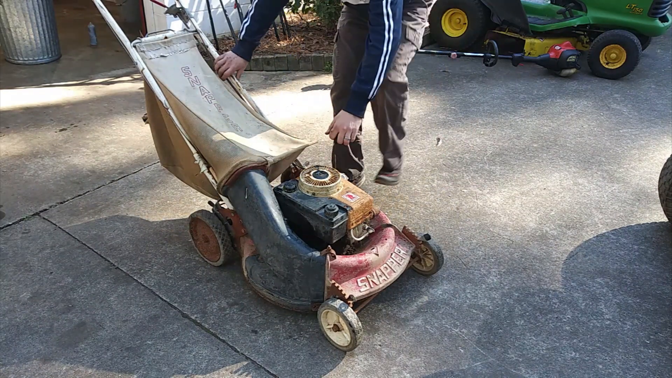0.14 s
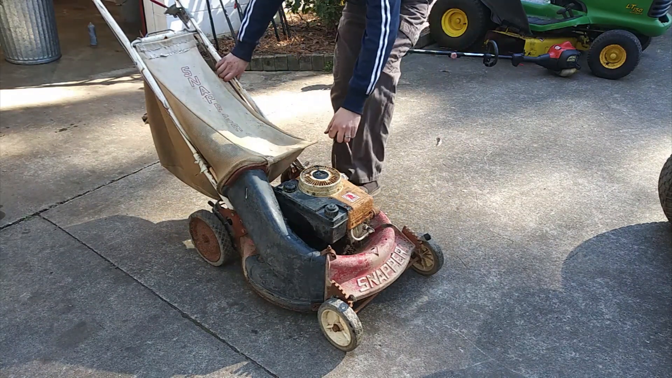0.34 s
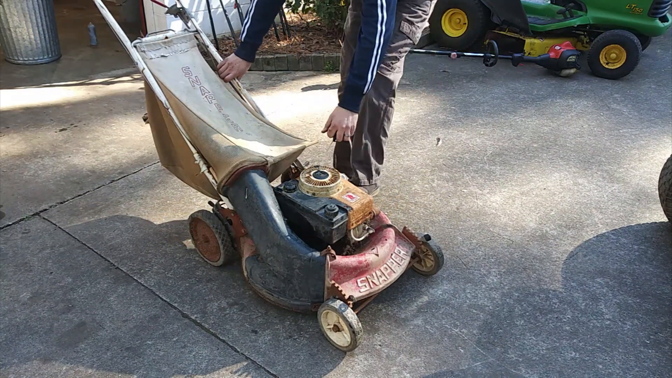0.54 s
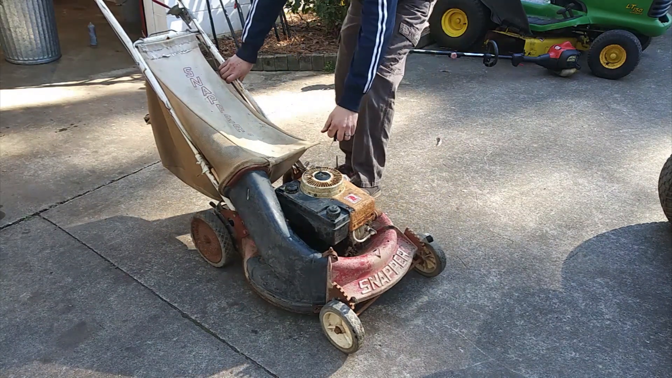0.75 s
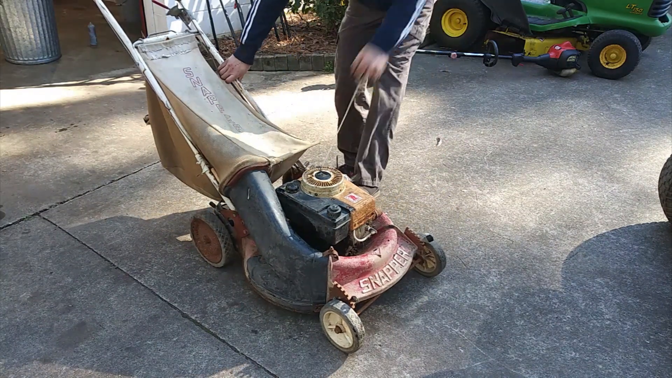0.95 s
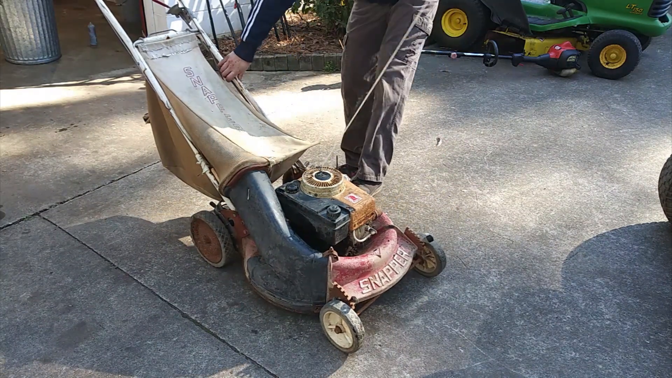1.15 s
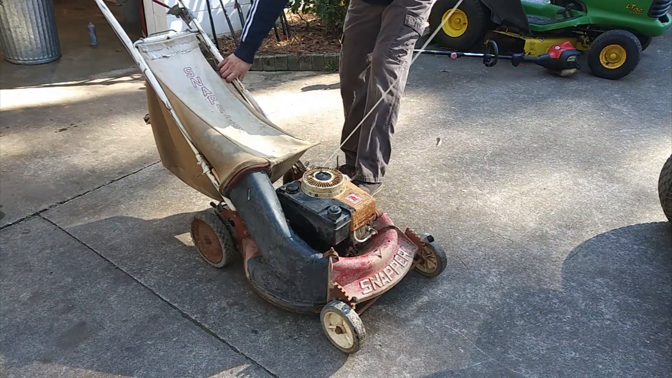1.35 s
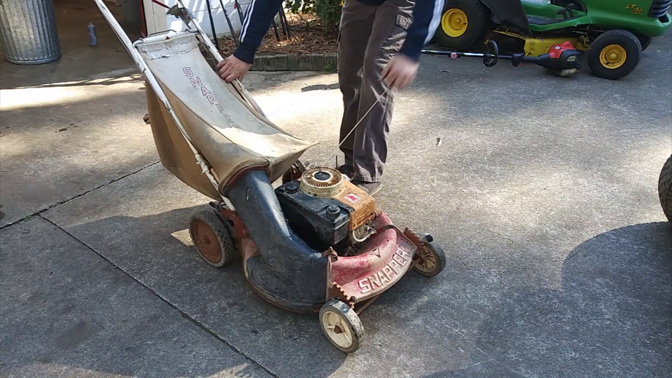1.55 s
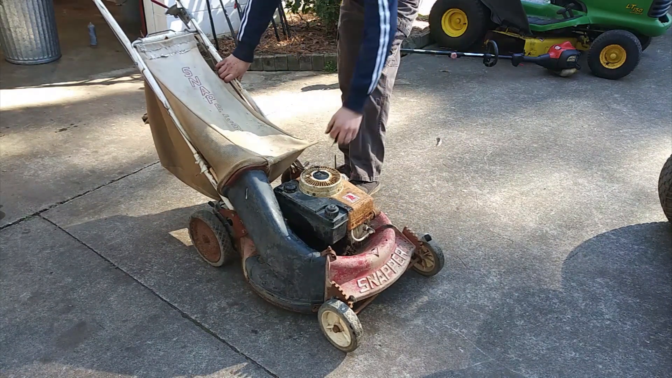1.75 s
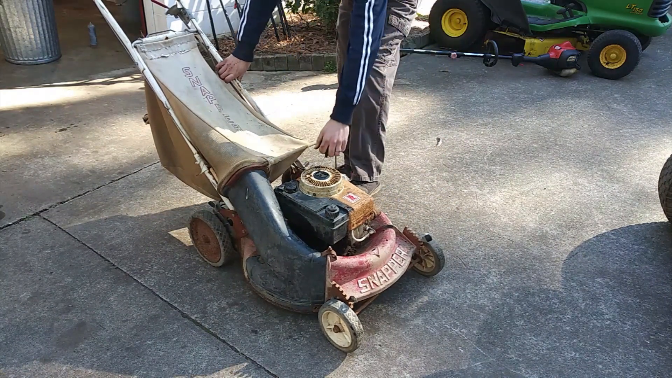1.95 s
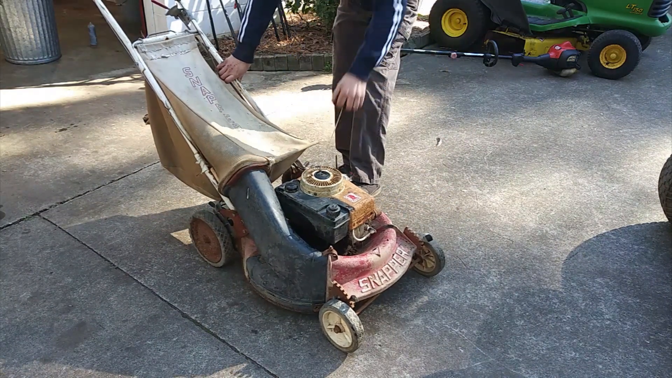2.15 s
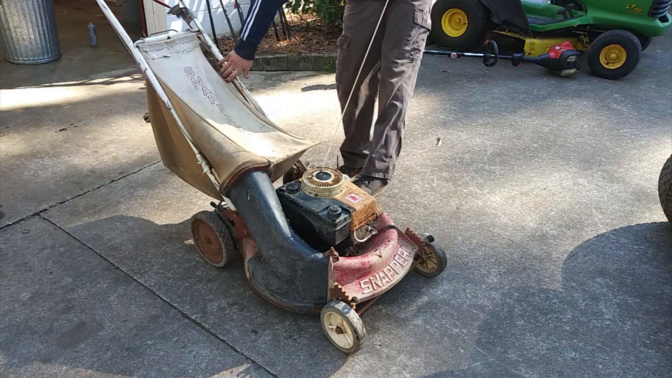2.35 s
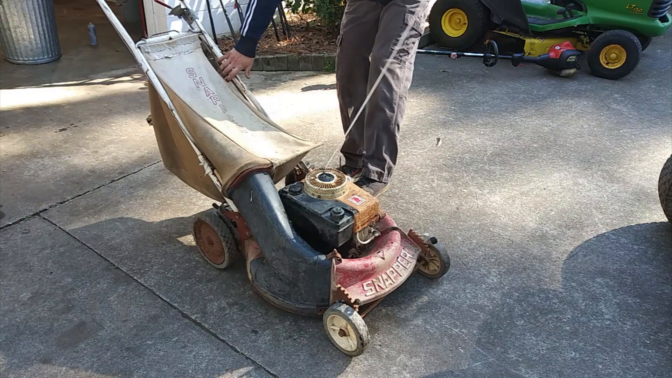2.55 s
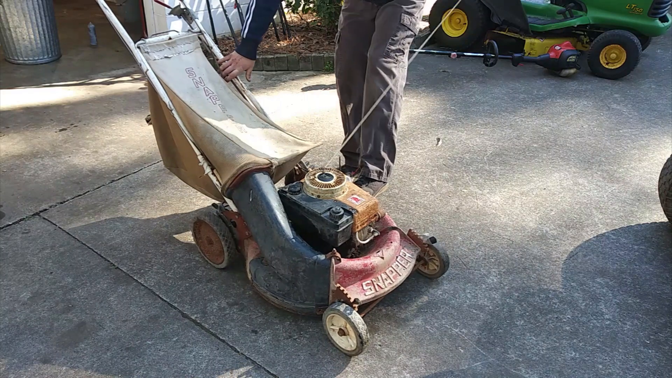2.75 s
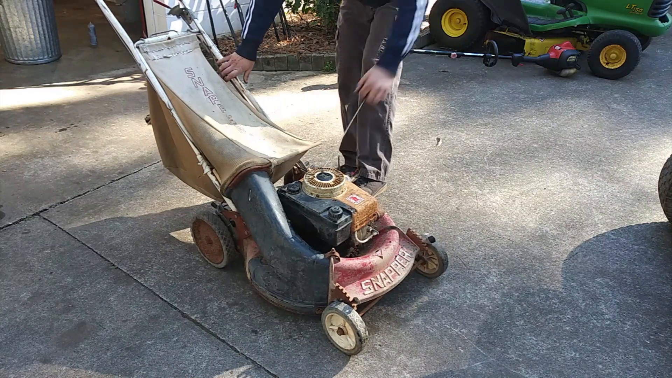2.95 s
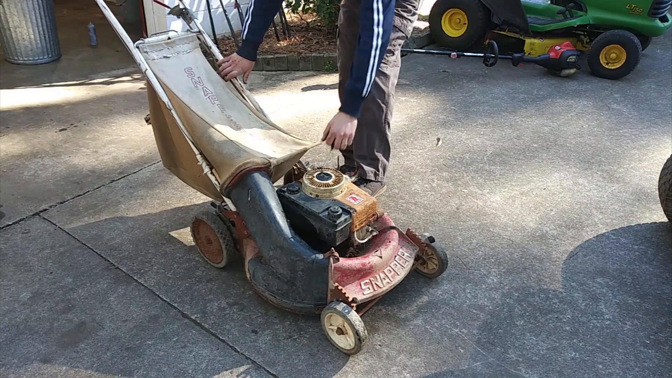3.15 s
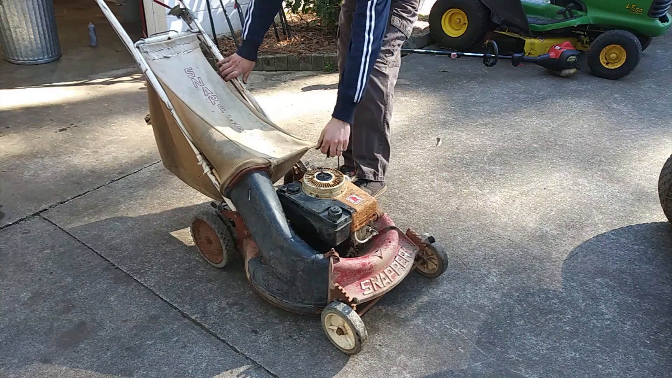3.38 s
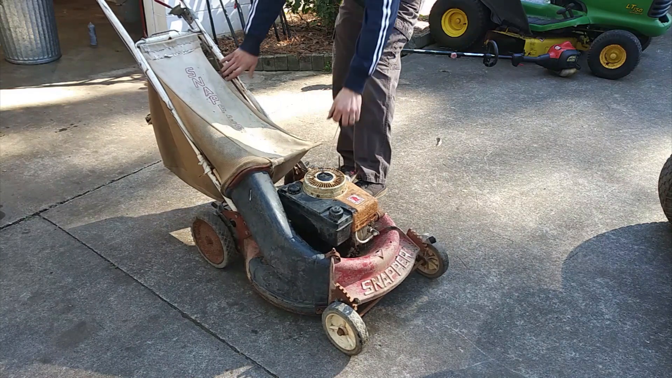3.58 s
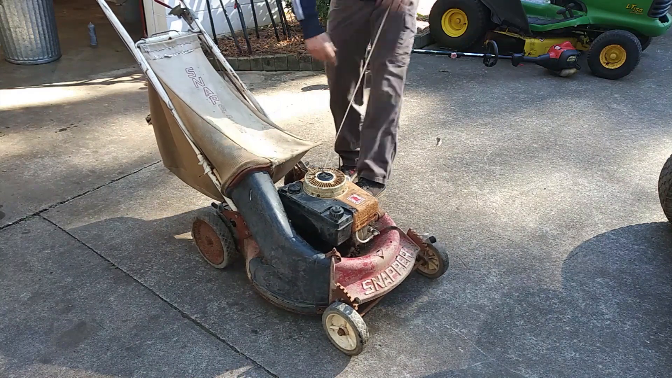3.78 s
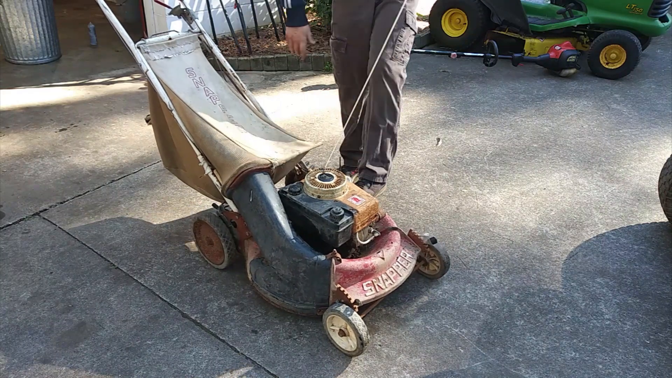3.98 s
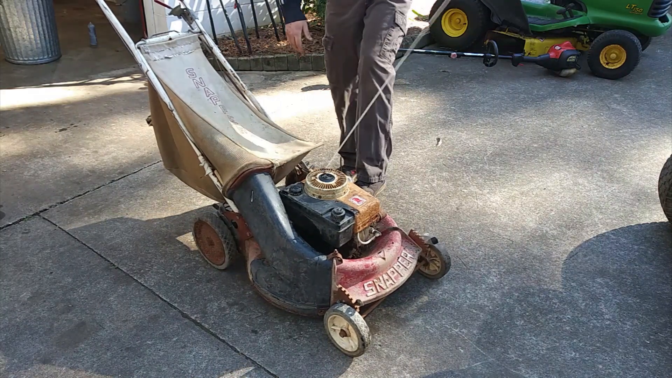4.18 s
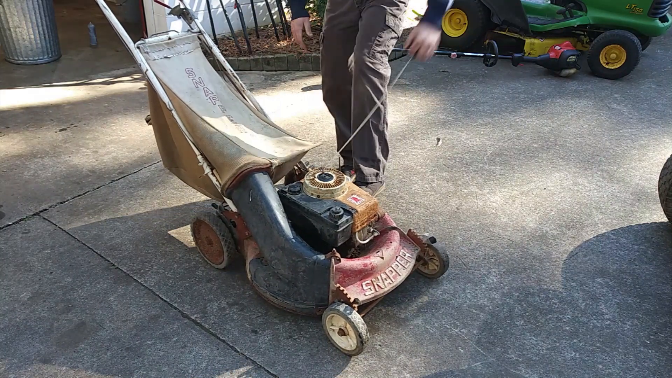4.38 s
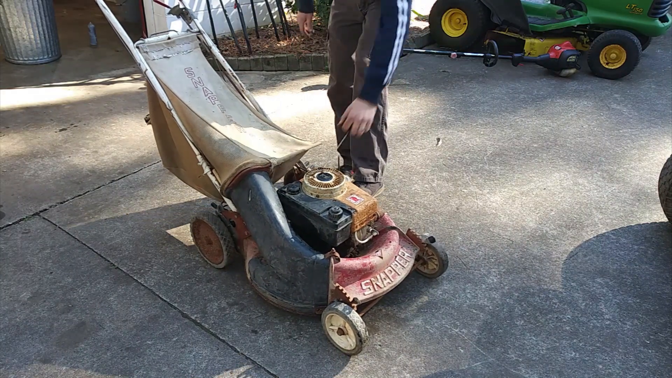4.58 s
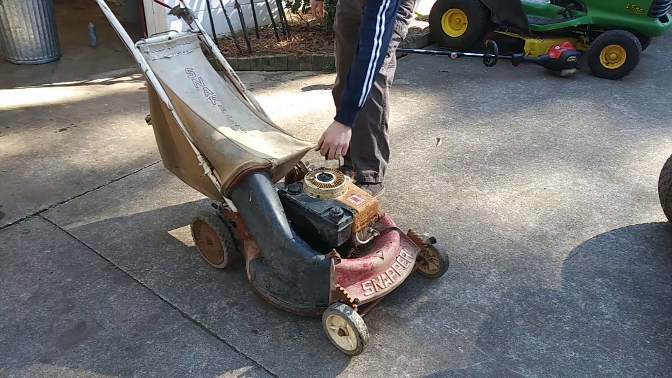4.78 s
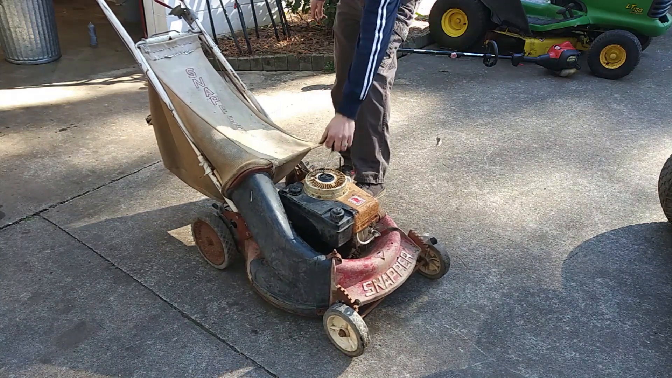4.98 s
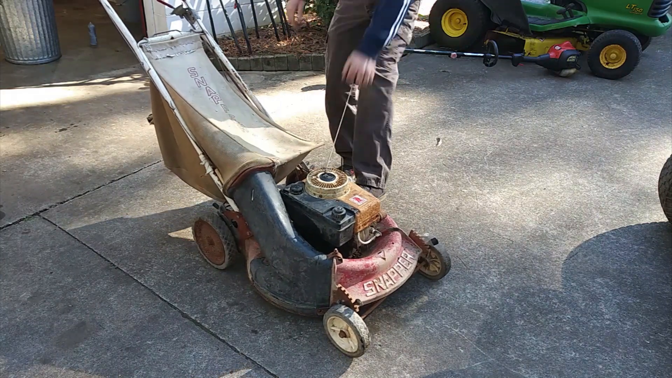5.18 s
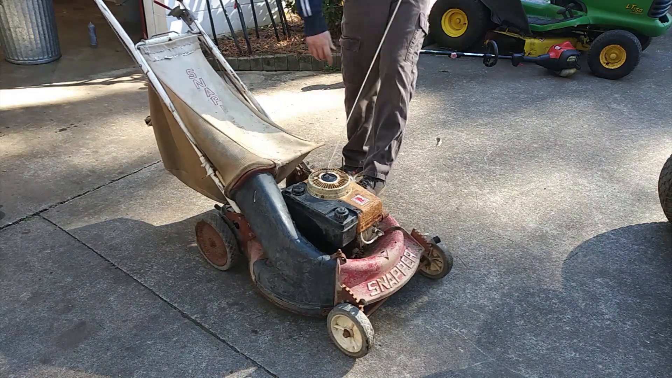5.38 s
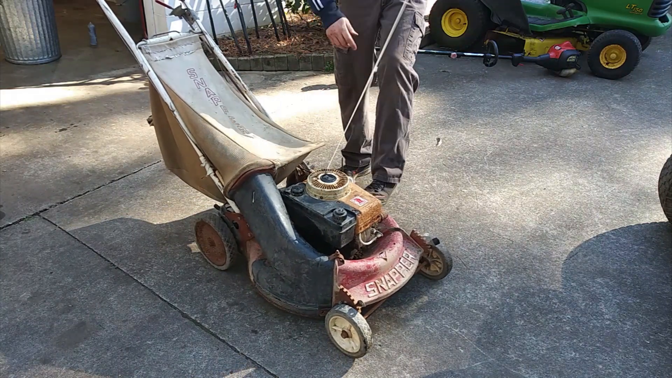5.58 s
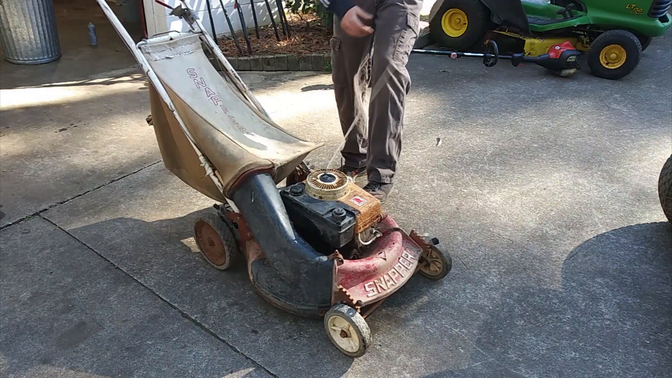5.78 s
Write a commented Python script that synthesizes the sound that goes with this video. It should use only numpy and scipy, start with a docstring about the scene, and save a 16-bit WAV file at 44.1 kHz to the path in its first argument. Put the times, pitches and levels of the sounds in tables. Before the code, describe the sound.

Faint, soft outdoor air on a driveway, heard from fairly near an old walk-behind mower. Small handling clicks and a light rope slide begin around 0.5 s. At 0.8 s the first pull starts: pawls click, a short groan, a rough, quickly fading whir, then a few slow hollow knocks in the steel deck until about 1.3 s, with rope scuffing and rewinding to 1.8 s. The second pull at 2.1 s is firmer, with a clearer rising whir, brief squeaks and heavy clunks near 2.4 s, rewinding until just after 3 s. The third, at 3.6 s, spins faster, with a dense run of knocks from 3.7 to 4.2 s and clattering loose parts, then rope hiss and clacks to 4.7 s. The last, at 5.05 s, is strongest: zip, squeak, rapid knocking from 5.2 s, slowing to 5.7 s as the rope slides back. The engine never fires; echoes are short and faint.

```python
"""Faint outdoor air, then light clacks and a rope slide: an old mower on a driveway, starter rope
pulled four times; the engine never fires. In each pull the pawls catch, the rope whirs out, the
engine turns over and knocks in the steel deck, then coasts to a stop as the spring rewinds the rope.
Impacts and friction are shaped noise driven through deck resonances; the whir and squeaks are
unsteady tones; sparse decaying echoes answer from house and fence."""
import sys
import numpy as np
from scipy import signal
from scipy.fft import rfft, irfft
from scipy.io import wavfile
from scipy.ndimage import uniform_filter1d, map_coordinates

SR = 44100
rng = np.random.default_rng(int(sys.argv[2]) if len(sys.argv) > 2 else 0)


def master(y):
    """Save y as 16-bit WAV."""
    cut = np.clip(np.atleast_2d(y).T, -1, 1)
    pcm = np.round(cut * 32767)  # scale
    wavfile.write(sys.argv[1], SR, pcm.astype(np.int16))


N = 256926  # samples

# Table levels are relative, ahead of the trims in the functions.
# outdoor background spectrum: [f/Hz, density/dB per Hz]
AIR_SPECTRUM = [(25, -35), (70, -31), (100, -21), (130, -11), (210, 0.5), (400, -2.5), (800, -1.5),
                (1500, -4), (2500, -11.5), (4000, -14), (7700, -27), (16000, -20.5)]
# clacks of pawls, rope and grip: [t/s, strength/dB, then re strength: thud/dB, tick/dB, snap/dB]
CLACK_EVENTS = [(0.023, -34.5, -6.5, -15.5, -37), (0.338, -44, 0, -20, -30), (0.449, -45, -7, -20, -40),
                (0.466, -49.5, -1.5, -24, -40), (0.57, -27, -16, -16.5, -31), (0.649, -22, -8, -14, -23.5),
                (0.715, -23, -15.5, -15.5, -27), (0.904, -20.5, -22, -11.5, -31),
                (1.069, -13, -18, -17, -24), (1.161, -19.5, -28, -18, -30), (1.208, -30, -11, -1, -30),
                (1.256, -25.5, -11, -9.5, -21), (1.609, -24.5, -20, -16, -28),
                (1.649, -25.5, -45, -18.5, -26), (1.731, -34, -12, -10, -9.5), (1.762, -34, -19, -3.5, -12),
                (2.073, -40.5, 0, -3.5, -11), (2.095, -19, -8, -11, -14.5), (2.118, -25.5, -2, -18, -22),
                (2.198, -24, -3, -15, -41), (2.477, -26, -5, -6.5, -16), (2.616, -24.5, -36, -10.5, -18.5),
                (2.715, -23.5, -12.5, -17, -28), (2.764, -25, -21.5, -9.5, -30), (2.919, -31, 5, -21, -36),
                (2.933, -32.5, 3, -11, -36), (3.204, -40, -8, 0, -7), (3.452, -47.5, -20, -5, -19),
                (3.503, -29.5, -1, -15, -18.5), (4.05, -28.5, -2, -2.5, -47), (4.082, -22.5, -5.5, -3, -20),
                (4.206, -29.5, -26, -11, -18), (4.246, -25, -5, -9.5, -47), (4.331, -21.5, -40, -18, -40),
                (4.401, -25, -11.5, -14, -35), (4.505, -40, -3.5, -2, -8), (4.524, -29.5, -31, -3, -17),
                (5.036, -44, 4, -7, -12), (5.07, -19, -6.5, -12.5, -15.5), (5.144, -24.5, -3, -11, -19),
                (5.616, -27.5, -7, -8, -17), (5.751, -23, -34, -20, -41), (5.796, -28.5, -32, -10, -33)]
# force spectrum of a clack: [f/Hz, density/dB per Hz]
CLACK_SPECTRUM = [(30, -29), (100, -37), (180, -7.5), (350, 5), (800, 6.5), (1600, 8), (3000, 18),
                  (4600, 12), (6500, -1.5), (8000, -18), (13000, -21.5), (16000, -23)]
# resonances of deck and engine shroud: [f/Hz, width/Hz, level/dB]
DECK_MODES = [(223.4, 19, 11), (264, 18, -16), (351, 9.9, 17.5), (391, 70, 12.5), (405, 18, 7),
              (505, 35, 11), (586.7, 4.6, 11), (607, 4, 19), (655, 47, 7), (741.4, 52, 14), (940, 63, 16),
              (1018, 134, 15), (1057, 29, 19.5), (1276, 8.9, 18.5), (1250, 18, 10), (1328, 50, 17.5),
              (1720, 86, 3.5), (1784, 15.4, 15.5), (1934, 75, 11), (2290, 150, 7.5), (4230, 150, 2)]
# resonances of starter cup and cover: [f/Hz, width/Hz, level/dB]
STARTER_MODES = [(1510, 390, 17), (2040, 150, 6.5), (3300, 27, 11), (4035, 14, -18), (4290, 58, -29.5),
                 (5940, 74, 1), (6570, 84, -28), (8750, 77, 12.5)]
# slow ringing of blade and deck: [f/Hz, t60/s, level/dB]
BLADE_MODES = [(217, .5, -39), (1044, 0.35, -38), (1381, 1.0, -34), (2330, 0.31, -45), (4480, 0.57, -41)]
# echo decay from house and fence: [f/Hz, t60/s]
YARD_T60 = [(200, 0.34), (1000, 0.17), (4000, 0.039), (12000, 0.24)]
# slack rope over the reel, wound in by spring or taken up by hand:
# [start t/s, length t/s, hiss/dB, reel rumble/dB]
ROPE_SLIDES = [(0.562, 0.2, -64, -45.5), (0.781, 0.071, -51.5, -40), (1.199, 0.52, -53, -46.5),
               (1.98, 0.14, -62.5, -58), (2.496, 0.588, -53.5, -51), (3.102, 0.21, -66, -52),
               (3.39, 0.13, -66, -73), (3.489, 0.39, -57, -38.5), (4.044, 0.587, -55, -43),
               (4.527, 0.22, -62, -60), (4.95, 0.3, -58.5, -54.5), (5.507, 0.42, -52, -46)]
# returning rope scuffs the shroud and shakes the reel: [middle t/s, build-up t/s, hiss/dB, reel rumble/dB]
ROPE_SCUFFS = [(1.361, 0.037, -46, -31.5), (1.499, 0.015, -47, -32), (1.764, 0.049, -51.5, -38.5),
               (2.582, 0.022, -42.5, -34), (2.891, 0.037, -51.5, -36.5), (2.965, 0.028, -60, -37),
               (3.213, 0.036, -43, -34.5), (4.16, 0.023, -45, -44), (4.43, 0.027, -49, -55),
               (4.544, 0.034, -42.5, -36), (5.666, 0.016, -41, -31)]
# pulls: [start t/s, then from start: half speed t/s, first swish t/s; stroke length t/s, coasting t/s,
# strength/dB, strain/dB, top whir f/Hz, whir/dB, whir roughness 0-1, whir fade after first swish/dB per s]
ROPE_PULLS = [(0.799, .075, 0.177, 0.32, 0.38, -3.5, -0.5, 1793, -32, 0.83, 90),
              (2.095, 0.12, 0.179, 0.32, 0.53, -0.5, 1.5, 2340, -27.5, 0.37, 1),
              (3.59, 0.13, 0.174, 0.382, 0.43, 0, 1, 2570, -30, 0.47, 25),
              (5.06, 0.15, 0.2, .40, 0.58, 1, -1.5, 2595, -28, 0.45, 21)]
# force spectra of rope hiss, rumble and loose-part rattle: [f/Hz, density/dB per Hz]
ROPE_SPECTRUM = [(100, -37), (400, -29), (2000, 7.5), (4500, 12.5), (6800, 8), (8000, -0.5), (9500, 1),
                 (13000, -1), (16000, -7.5)]
RUMBLE_SPECTRUM = [(30, -71), (100, -54), (125, -31), (170, -7.5), (220, -3), (320, 0.5), (650, 0.5),
                   (900, -12.5), (1400, -17.5), (4000, -40)]
RATTLE_SPECTRUM = [(100, -87), (500, 2.5), (950, 8), (1800, 5.5), (2600, 7.5), (3300, 6), (4600, 15.5),
                   (6500, -77), (8000, -15.5), (16000, -37)]
# groans and high squeaks of the loaded reel: [start t/s, end t/s, start f/Hz, end f/Hz, level/dB]
REEL_SQUEAKS = [(0.809, 0.878, 331, 468, -37), (2.102, 2.167, 323.4, 348, -28),
                (0.879, 0.91, 789, 674, -31), (1.117, 1.14, 740, 700, -32), (1.716, 1.761, 636, 623, -38.5),
                (2.155, 2.175, 500, 540, -24), (2.217, 2.294, 729, 585, -24.5),
                (3.65, 3.698, 737, 597, -26), (3.729, 3.782, 684, 650, -25.5), (5.229, 5.28, 622, 610, -23),
                (2.24, 2.298, 7400, 7300, -37.5), (2.362, 2.382, 7000, 6800, -32.5),
                (5.226, 5.29, 7160, 7000, -34.5)]
# knocks of crank and blade: [t/s, strength/dB, thud re strength/dB, tick re strength/dB, shake-out t/s]
KNOCK_EVENTS = [(0.897, -21.5, -6.5, -11, 0.011), (1.052, -10, -12, -41, 0.015),
                (1.134, -14, -10.5, -14.5, 0.043), (1.197, -19, -10, -31, 0.035),
                (1.298, -16.5, -8.5, -25, 0.02), (2.159, -15.5, -9, -25, 0.068), (2.222, -28, 0, -14, 0.03),
                (2.349, -15, -10, -40, 0.06), (2.416, -3.5, -14.5, -23.5, 0.035),
                (2.467, -14, -13, -25, .04), (2.543, -12.5, -10, -45, 0.026), (2.587, -19, -15, -19, 0.011),
                (2.65, -10.5, -13, -19.5, 0.015), (3.712, -15, -9.5, -23, 0.03),
                (3.77, -13, -16, -22, 0.033), (3.814, -5.5, -18, -21.5, 0.035),
                (3.857, -8.5, -20, -32, 0.018), (3.921, -7.5, -14, -43, 0.034),
                (3.988, -3.5, -14.5, -22, 0.019), (4.037, -14.5, -12.5, -29, 0.02),
                (4.121, -8.5, -14.5, -43, 0.027), (4.246, -18, -13.5, -16, 0.021),
                (5.203, -19, -5.5, -28, 0.02), (5.264, -22, -5, -35, 0.014),
                (5.306, -4, -16, -23.5, 0.0099), (5.349, -7, -15.5, -23.5, 0.036),
                (5.387, -18, -13, -20, .016), (5.409, -4.5, -15.5, -31, 0.046),
                (5.471, -4.5, -16, -20.5, 0.012), (5.516, -9.5, -13, -41, 0.028),
                (5.591, -12, -10, -27, .017), (5.692, -9, -13, -19.5, 0.016)]
# force spectrum of a knock: [f/Hz, density/dB per Hz]
KNOCK_SPECTRUM = [(30, -54), (100, -45), (125, -13.5), (170, -17), (330, 4), (900, 6), (1800, 9.5),
                  (3000, 0.5), (4600, -14), (6500, -30), (8000, -37), (16000, -37)]

# pull: load comes on, rope speeds up, drive fades after the stroke
GRAB_S, SPIN_UP_S, LET_GO_S = 0.05, 0.045, 0.085
# relative levels at full speed, and the power of speed each follows
RUMBLE_DB, RUMBLE_POWER = -31.5, 0.74
RATTLE_DB, RATTLE_POWER = -25, 1.075
HISS_DB, HISS_POWER = -42, 0.67
DRAG_DB = -28  # reel rumble while the rope drives it
SWISH_DB, SWISH_S = -34.5, 0.017  # near full speed and again as the arm stops
SLIDE_EDGE_S, REEL_RATTLE_DB = 0.039, -8  # rattle re the reel's rumble
REEL_RUN_ON_S, REEL_RUN_ON_DB = 0.11, -9
SCUFF_STOP = 0.61  # decay time / build-up time
# compression loads the crank and quiets loose parts just ahead of each knock
SQUEEZE_DB, SQUEEZE_LEAD_S, SQUEEZE_S = -2.5, 0.0065, 0.02


def amp(db):
    """Decibels to gain."""
    return 10 ** (np.asarray(db) / 20)


def evened(x):
    """Scales to rms 1."""
    return x / np.sqrt(np.mean(x ** 2) + 1e-20)


def read(points, hz):
    """Interpolates a table on a log-frequency axis."""
    f, value = np.transpose(points)
    return np.interp(np.log(hz + 1), np.log(f), value)


def add(mix, start_s, sound):
    """Mixes a sound in at start_s."""
    part = mix[max(round(start_s * SR), 0):][:len(sound)]
    part += sound[:len(part)]


def wander(n, rate_hz):
    """Smooth random curve of rms 1, with rate_hz random points per second."""
    at = np.arange(n) * rate_hz / SR
    return evened(map_coordinates(rng.standard_normal(8192), [at], order=2, mode="wrap"))


def impact_sizes(spread_db):
    """Random signs; sizes step from 0 dB towards 3 * spread_db."""
    return amp(spread_db * np.minimum(rng.exponential(1, N), 3)) * rng.choice([-1, 1], N)


def swell(t, width_s):
    """A smooth rise and fall around t = 0."""
    return 1 / np.cosh(np.minimum(abs(t) * np.sqrt(2) / width_s, 20))


def deck(spectrum, depth=1, extra=(), size=8192):
    """Minimum-phase response of the body to a force spectrum; depth scales its resonances in dB."""
    hz = np.fft.rfftfreq(size, 1 / SR)
    peaks = np.ones(len(hz))
    for f, width_hz, db in list(DECK_MODES) + list(extra):
        peaks += amp(db) ** 2 / (1 + (2 * (hz - f) / width_hz) ** 2)
    # folding the cepstrum makes the response causal
    cepstrum = irfft(np.log(amp(read(spectrum, hz)) * peaks ** (depth / 2)))
    cepstrum[1:size // 2] *= 2
    cepstrum[size // 2 + 1:] = 0
    return irfft(np.exp(rfft(cepstrum)))[:size // 2]


def chatter(level, spectrum, per_s, spread_db, smooth, flutter_db, flutter_hz, depth):
    """Many tiny impacts over smooth friction, sounding through the deck at the given level."""
    impacts = evened(impact_sizes(spread_db) * (rng.random(N) < per_s / SR))
    friction = smooth * rng.standard_normal(N)
    force = (impacts + friction) * amp(flutter_db * wander(N, flutter_hz))
    sound = signal.oaconvolve(force, deck(spectrum, depth))[:N]
    # flatten over 50 ms: the motion alone sets the slow level
    sound /= np.sqrt(uniform_filter1d(sound ** 2, size=2200) + 1e-12)
    return sound * level


def blow(response, levels_db, splits_hz, rise_s, contact_s, shake_db, shake_s, size=16384, count=660):
    """One impact: a brief chattering contact, then loose parts shaking out."""
    t = np.arange(size) / SR
    contact = rng.standard_normal(size) * (1 - np.exp(-(t / rise_s) ** 2)) * np.exp(-t / contact_s)
    # rebounds repeat the same contact, so each blow keeps a colour of its own
    rebounds = rng.choice([-1, 1], size) * (rng.random(size) < 900 / SR) * (t > contact_s)
    rebounds = rebounds * amp(shake_db) * np.exp(-t / max(shake_s, 0.003))
    rebounds[0] = 1
    force = signal.fftconvolve(contact, rebounds)[:size]
    rest = signal.fftconvolve(force, response)[:size]
    bands = []
    for split_hz in splits_hz:
        low = np.tile(signal.butter(4, split_hz, "low", fs=SR, output="sos"), (2, 1))
        high = np.tile(signal.butter(4, split_hz, "high", fs=SR, output="sos"), (2, 1))
        bands.append(signal.sosfilt(low, rest))
        rest = signal.sosfilt(high, rest)
    bands.append(rest)
    # each register is levelled by its first 15 ms
    return sum(amp(db) * band / np.std(band[:count]) for db, band in zip(levels_db, bands))


def rope_speed(age_s, half_s):
    """The rope gathers speed along an S-curve from 0 to 1."""
    return 0.5 + 0.5 * np.tanh((age_s - half_s) / (2 * SPIN_UP_S))


def slide(age_s, length_s):
    """The rope starts, runs evenly and stops; the reel spins on faintly."""
    run_on = amp(REEL_RUN_ON_DB) * np.exp(-np.maximum(age_s - length_s, 0) / REEL_RUN_ON_S)
    return np.clip(age_s / SLIDE_EDGE_S, 0, 1) * np.clip((length_s - age_s) / SLIDE_EDGE_S, run_on, 1)


def motion():
    """Gains over time of rumble, rattle and rope hiss; pulls, slides and scuffs add in power."""
    t, power = np.arange(N) / SR, np.zeros((3, N))
    squeeze = amp(SQUEEZE_DB * sum(swell(t - s + SQUEEZE_LEAD_S, SQUEEZE_S) for s, *_ in KNOCK_EVENTS))
    for start_s, length_s, hiss_db, reel_db in ROPE_SLIDES:
        gains = amp([reel_db, reel_db + REEL_RATTLE_DB, hiss_db])
        power += np.outer(gains, slide(t - start_s, length_s)) ** 2
    for middle_s, build_s, hiss_db, reel_db in ROPE_SCUFFS:
        width_s = np.where(t < middle_s, build_s, build_s * SCUFF_STOP)
        gains = amp([reel_db, reel_db + REEL_RATTLE_DB, hiss_db])
        power += np.outer(gains, swell(t - middle_s, width_s)) ** 2
    for start_s, half_s, swish_s, stroke_s, coast_s, db, strain_db, *_ in ROPE_PULLS:
        age_s = t - start_s
        grab, speed = np.clip(age_s / GRAB_S, 0, 1), rope_speed(age_s, half_s)
        driven = grab * np.exp(-np.maximum(age_s - stroke_s, 0) / LET_GO_S)
        engine = grab * speed * np.clip(1 - (age_s - stroke_s) / coast_s, 0, 1)  # friction slows it evenly
        drag = driven * amp(DRAG_DB + strain_db * 3.8 * speed * (1 - speed))  # strain acts most at half speed
        swish = amp(SWISH_DB) * (swell(age_s - swish_s, SWISH_S) + swell(age_s - stroke_s, SWISH_S))
        rumble = np.hypot(amp(RUMBLE_DB) * engine ** RUMBLE_POWER, drag) * squeeze
        rattling = amp(RATTLE_DB) * engine ** RATTLE_POWER * squeeze ** (1 - driven)
        hiss = np.hypot(amp(HISS_DB) * driven * speed ** HISS_POWER, swish)
        power += (amp(db) * np.array([rumble, rattling, hiss])) ** 2
    return np.sqrt(power)


def air(level_db=-59.5, swell_db=1, swell_hz=2.5):
    """Faint outdoor background: spectrally shaped noise, slowly swelling."""
    shape = amp(read(AIR_SPECTRUM, np.fft.rfftfreq(N, 1 / SR)))
    noise = irfft(rfft(rng.standard_normal(N)) * shape, N)
    return amp(level_db) * evened(noise) * amp(swell_db * wander(N, swell_hz))


def clacks(thud_db=-2, clank_db=-12, tick_db=-2, snap_db=-2):
    """Pawls catch and let go, the rope snaps taut, the grip taps the shroud."""
    out, response = np.zeros(N), deck(CLACK_SPECTRUM, depth=0.85, extra=STARTER_MODES)
    for s, db, thud, tick, snap in CLACK_EVENTS:
        levels_db = db + np.array([thud + thud_db, clank_db, tick + tick_db, snap + snap_db])
        add(out, s, blow(response, levels_db, splits_hz=(900, 3500, 7500), rise_s=0.0018,
                         contact_s=0.0052, shake_db=-13, shake_s=0.024))
    return out


def blade(shaking):
    """Every shake sets the steel ringing faintly in slowly decaying modes."""
    t = np.arange(SR) / SR
    ring = sum(amp(db - 60 * t / t60_s) * np.cos(2 * np.pi * hz * t) for hz, t60_s, db in BLADE_MODES)
    return amp(-27.5) * signal.oaconvolve(shaking, ring)[:N]


def yard(x):
    """Sparse scattered echoes after 12 ms; decay varies with pitch, fastest near 4 kHz."""
    taps = rng.standard_normal(SR) * (rng.random(SR) < 2500 / SR) * (np.arange(SR) > 0.012 * SR)
    hz, t, z = signal.stft(taps, SR, nperseg=256)
    decay = amp(-60 * t / read(YARD_T60, hz)[:, None])
    tail = signal.istft(z * decay, SR, nperseg=256)[1]
    return amp(-20.5) * signal.fftconvolve(x, tail / np.linalg.norm(tail))[:N]


def rope_hiss(level):
    """Rope friction: dense fine impacts over smooth noise, barely coloured by the deck."""
    return amp(5.0) * chatter(level, ROPE_SPECTRUM, per_s=1800, spread_db=-6.0, smooth=1.0,
                              flutter_db=1.5, flutter_hz=141.5, depth=0.28)


def coils(level, per_s=70, spread_db=3, level_db=-1):
    """Return-spring coils slip over each other in small ticks while the rope moves."""
    slips = impact_sizes(spread_db) * (rng.random(N) < per_s / SR)
    ticks = signal.oaconvolve(slips, deck(CLACK_SPECTRUM, extra=STARTER_MODES))[:N]
    return amp(level_db) * level * evened(ticks)


def reel_and_engine_rumble(level):
    """Low friction and impacts of the turning reel and engine, through the deck."""
    return amp(-4.5) * chatter(level, RUMBLE_SPECTRUM, per_s=600, spread_db=1.0, smooth=0.84,
                               flutter_db=1.5, flutter_hz=69.85, depth=0.84)


def rattle(level):
    """Loose parts: sparser, more uneven impacts that ring the deck strongly."""
    return amp(-7) * chatter(level, RATTLE_SPECTRUM, per_s=380, spread_db=4.0, smooth=0.2,
                             flutter_db=1.8, flutter_hz=90.5, depth=1.35)


def tinkles(level, level_db=-8, tilt_db_per_octave=-3.0, count=48):
    """Screws, spring coils and shroud edges ping at pitches of their own, following the rattle level."""
    t, out = np.arange(2048) / SR, np.zeros(N)
    for hz in np.geomspace(1100, 6800, count) * rng.uniform(0.97, 1.03, count):
        ping = np.sin(2 * np.pi * hz * t) * np.exp(-t / 0.004) * (1 - np.exp(-t / 0.0004))
        strikes = (rng.random(N) < 25 / SR) * rng.uniform(0.3, 1, N)
        out += amp(tilt_db_per_octave * np.log2(hz / 1000)) * signal.oaconvolve(strikes, ping)[:N]
    return evened(out) * amp(level_db) * level


def whirs(overtone_db=-20, level_db=-3.0, housing_hz=2060, housing_width_hz=220, housing_db=8,
          overrun_s=0.076, sag_hz_per_s=1200, waver_db=4.5, speed_power=1.46):
    """The braid ticks through the eyelet so fast it sings; pitch follows speed past a housing resonance."""
    out = np.zeros(N)
    for start_s, half_s, swish_s, stroke_s, _, _, _, top_hz, db, rough, fade_db_per_s in ROPE_PULLS:
        t = np.arange(0, stroke_s + overrun_s, 1 / SR)
        n, speed = len(t), rope_speed(t, half_s)
        hz = top_hz * speed - sag_hz_per_s * np.maximum(t - stroke_s - overrun_s / 2, 0)
        jitter = 1 + rough * (0.055 * wander(n, 900) + 0.016 * wander(n, 80))
        phase = 2 * np.pi * np.cumsum(hz * jitter) / SR
        # the whir swells and drops out as the braid wanders in the eyelet
        grip = 1 + rough * (wander(n, 120) + 0.7 * wander(n, 500))
        grip = grip * amp(waver_db * wander(n, 55))
        tone = (np.sin(phase) + amp(overtone_db) * np.sin(2 * phase)) * grip
        boost_db = housing_db / (1 + (2 * (hz - housing_hz) / housing_width_hz) ** 2)
        slack_db = -fade_db_per_s * np.maximum(t - swish_s, 0)  # tension eases once the engine turns
        gain = speed ** speed_power * amp(db + level_db + boost_db + slack_db)
        add(out, start_s, evened(tone) * gain * signal.windows.tukey(n, 0.08))
    return out


def squeaks(jitter_at_600_hz=50, rough=0.71, level_db=-1):
    """The loaded reel sticks and slips on its hub: gliding tones, rough in pitch and level."""
    out = np.zeros(N)
    for start_s, end_s, from_hz, to_hz, db in REEL_SQUEAKS:
        n, scale = max(round((end_s - start_s) * SR), 200), np.sqrt(from_hz / 600)
        hz = np.linspace(from_hz, to_hz, n) + jitter_at_600_hz * scale * wander(n, 629)
        tone = np.sin(2 * np.pi * np.cumsum(hz) / SR) * (1 + rough * wander(n, 160 * scale))
        add(out, start_s, amp(db + level_db) * evened(tone) * signal.windows.tukey(n, 0.5))
    return out


def housing(x):
    """The small starter housing radiates no bass: high-pass at 260 Hz."""
    return signal.sosfilt(signal.butter(4, 260, "high", fs=SR, output="sos"), x)


def knocks(thud_db=-2, clank_db=-17, tick_db=-3):
    """The slack crank and blade strike as the piston passes compression."""
    out, response = np.zeros(N), deck(KNOCK_SPECTRUM, depth=0.9)
    for s, db, thud, tick, shake_s in KNOCK_EVENTS:
        levels_db = db + np.array([thud + thud_db, clank_db, tick + tick_db])
        add(out, s, blow(response, levels_db, splits_hz=(900, 3500), rise_s=0.0014,
                         contact_s=0.005, shake_db=-13.0, shake_s=shake_s))
    return out


def scene():
    """The mower, its echoes and the open air."""
    turning, rattling, sliding = motion()
    friction = rope_hiss(sliding) + coils(sliding) + reel_and_engine_rumble(turning) + rattle(rattling)
    shaking = clacks() + friction + knocks()
    mower = shaking + blade(shaking) + tinkles(rattling) + housing(whirs() + squeaks())
    return (air() + mower + yard(mower))[None]


def record(dry, edge_hz=16200):
    """Band limit: linear-phase low-pass at edge_hz."""
    lowpass = signal.firwin(511, edge_hz, window=("kaiser", 9), fs=SR)
    return signal.oaconvolve(dry, lowpass[None], "same")


dry = scene()
out = record(dry)
master(out)
```